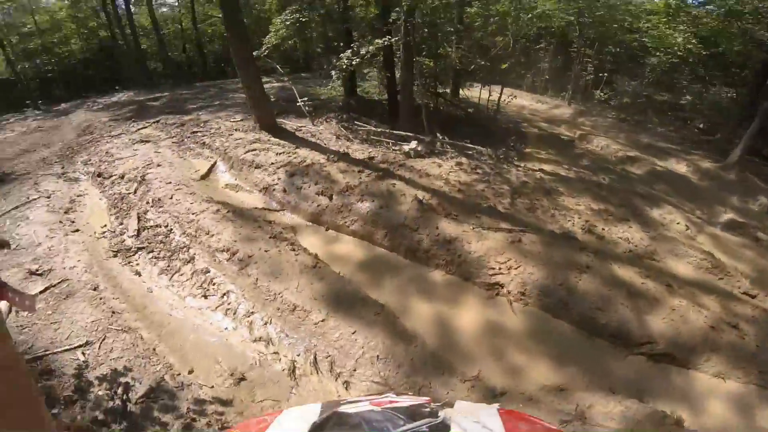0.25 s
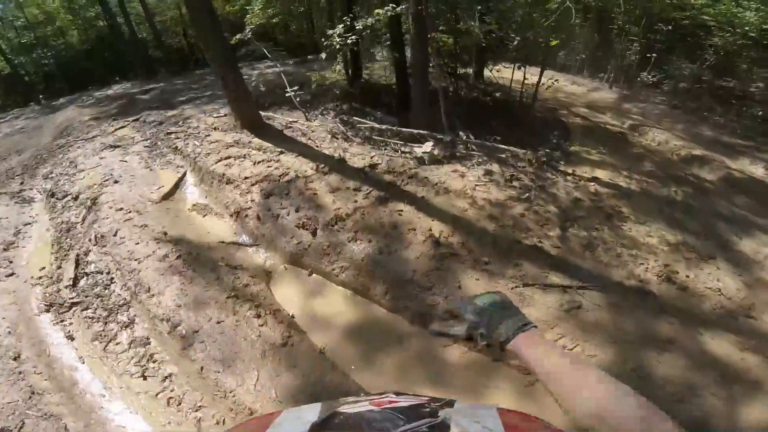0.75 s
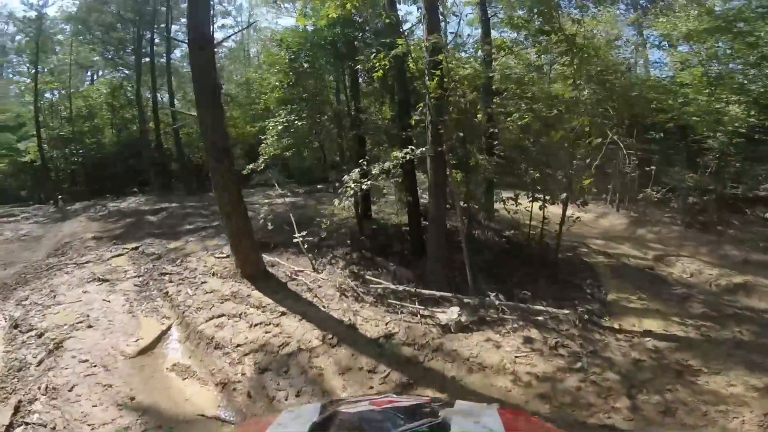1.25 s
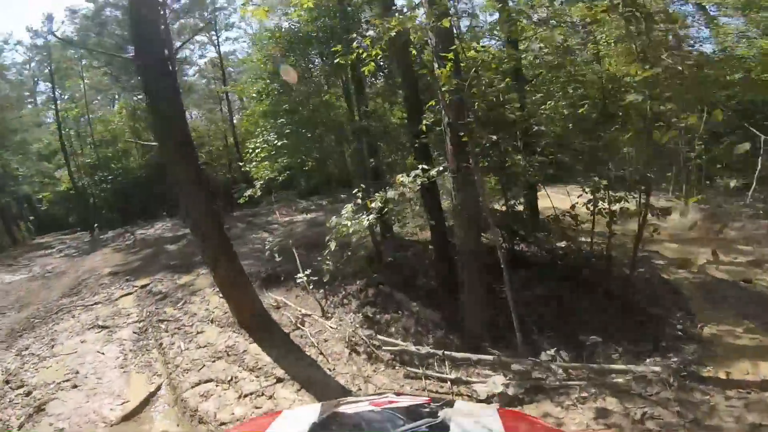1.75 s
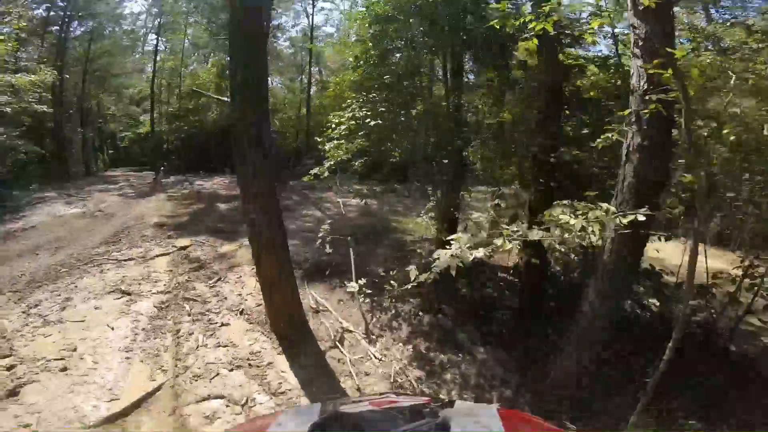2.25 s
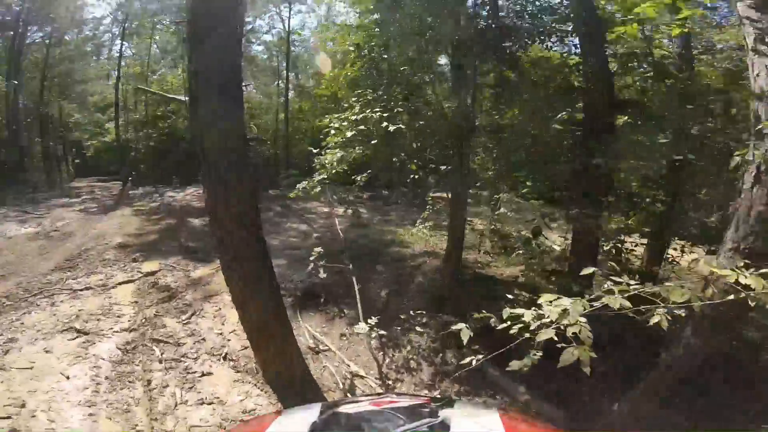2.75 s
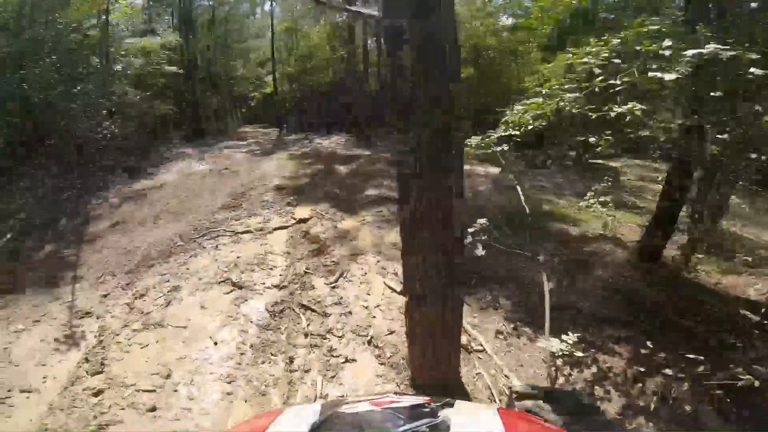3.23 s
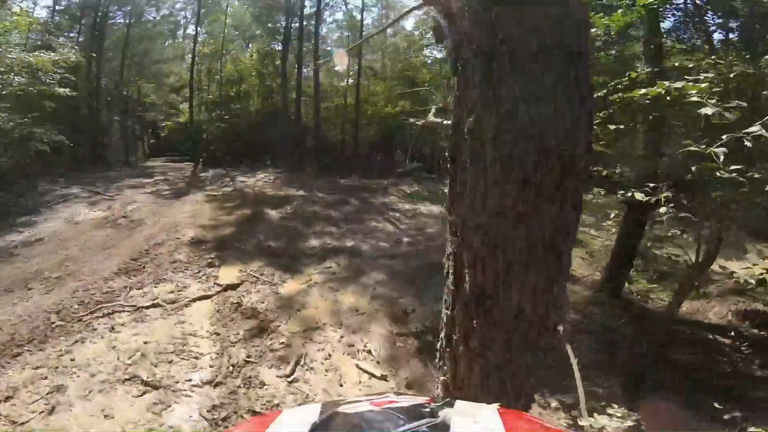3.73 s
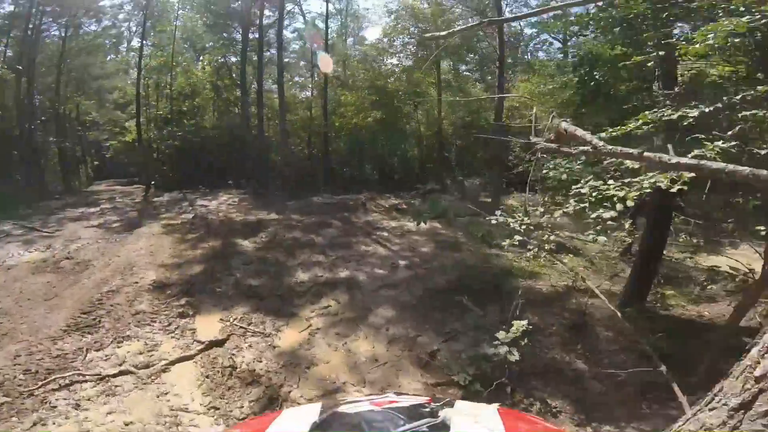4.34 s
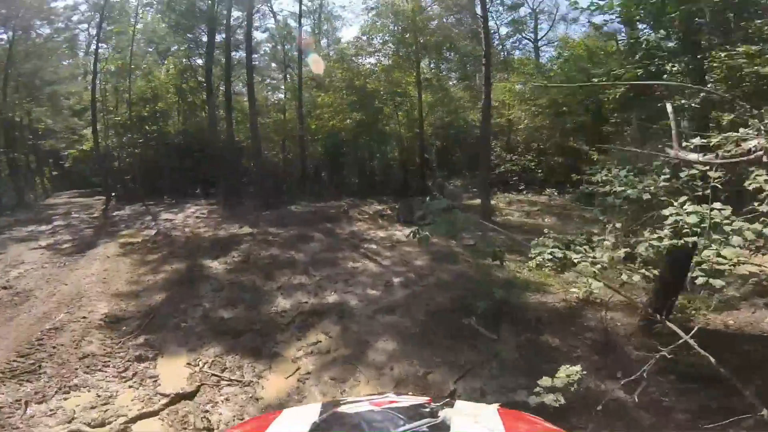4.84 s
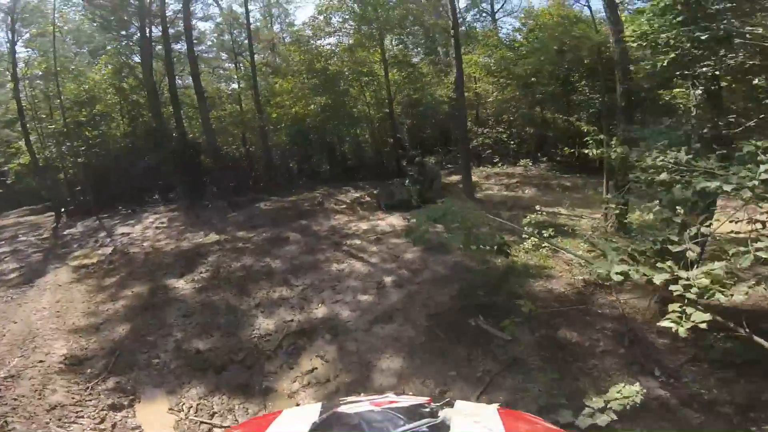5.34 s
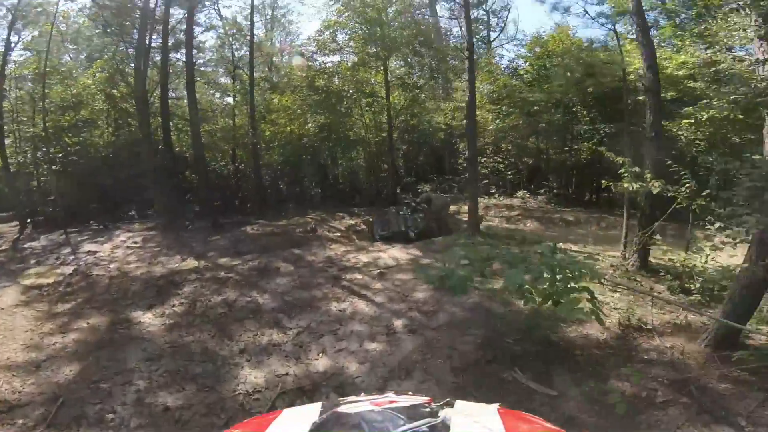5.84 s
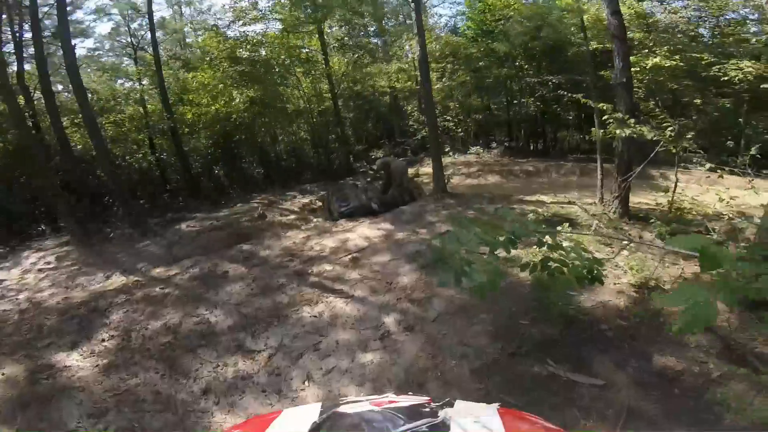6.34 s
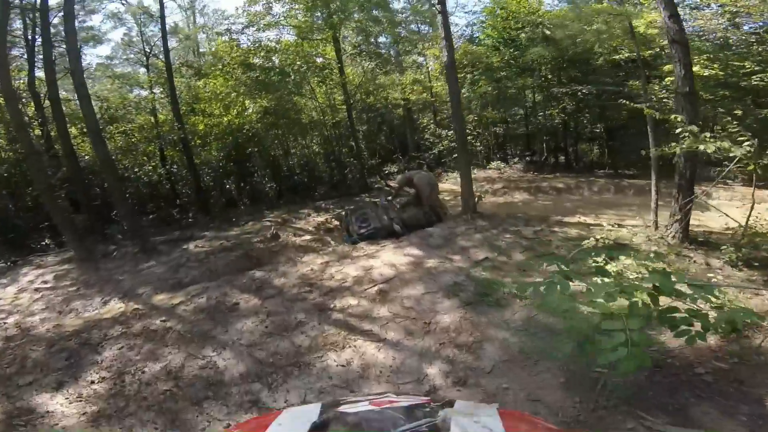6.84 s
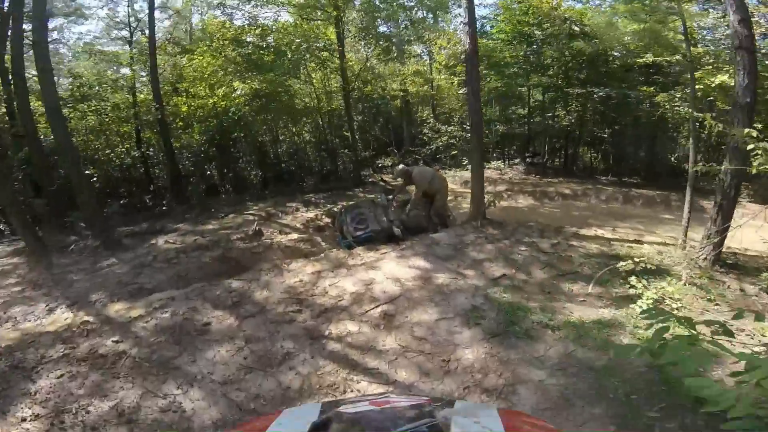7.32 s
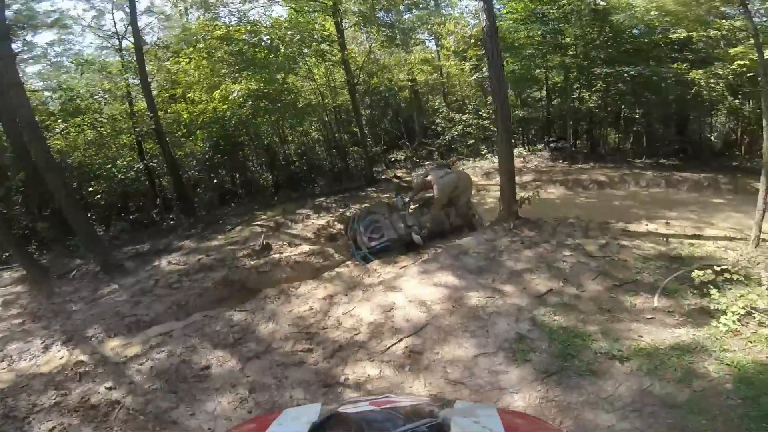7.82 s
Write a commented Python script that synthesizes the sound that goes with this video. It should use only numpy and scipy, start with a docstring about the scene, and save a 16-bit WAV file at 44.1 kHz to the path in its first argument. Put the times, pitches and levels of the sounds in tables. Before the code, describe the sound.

Outdoors on a wooded trail, close to the rider. From 0 to 0.5 s another machine revs upward with a growl and throbbing hiss, then fades, while a third engine idles alongside in slow, deep thuds. At about 0.6 to 1 s the rider's twin-cylinder ATV gives a short push and falls back. From 1.2 s the throttle opens into a long pull, full by 1.8 s and held to 4.3 s: uneven firings boom, drone, bark and rasp, with intake honks, belt whirr and loose rattles around 1.9 to 2.5 and 3.3 s; it labours briefly near 3.3 s. It drops to lumpy idle by 4.6 s. A free-running blip rises at 5.3 to 5.8 s, then slow puttering continues to about 8 s, with hiss, frame rumble, soft low bumps near 6.3, 7 and 7.6 s, and a quick scratchy brush at 7 s. Faint echoes scatter off ground and trunks.

```python
"""One first hears a machine rev briefly beside an idling one; then the rider's own twin-cylinder ATV takes over
on a wooded trail, with a short push, a long pull and a last blip between stretches of idle.
Each uneven pair of firings is a pair of pulses that excites pipe resonances: boom, drone, bark and rasp.
Filtered noise makes the belt and valve-gear hiss, whirrs, rattles, frame rumble and brushes of the rider's gear.
Soft low bumps at the microphone and scattered echoes from ground and trunks complete the scene."""
import sys
import numpy as np
from scipy import signal
from scipy.fft import rfft, irfft, next_fast_len
from scipy.io import wavfile

SR = 44100
rng = np.random.default_rng(int(sys.argv[2]) if len(sys.argv) > 2 else 0)


def pcm_store(signal):
    """Save signal as 16-bit PCM."""
    levels = np.round(np.clip(np.atleast_2d(signal), -1, 1) * 32767)
    wavfile.write(sys.argv[1], SR, levels.astype(np.int16).T)


N = 356107
T = np.arange(N) / SR  # time [s]
HZ = np.fft.rfftfreq(16384, 1 / SR)  # frequency grid of every filter [Hz]

# Levels below are relative: the functions add the trims of each layer.
# Engine speed on an open throttle: (time [s], cycle rate [1/s])
OPEN_SPEED = [(.8, 24.2), (.88, 23.7), (1, 25.5), (1.8, 23.15), (1.97, 24.26), (2.3, 24.28), (2.43, 25.05),
              (2.68, 25.1), (3.09, 23.23), (3.48, 23.72), (3.83, 25.39), (4.06, 24.85), (4.22, 25.4),
              (4.33, 25), (4.48, 21.5), (5.5, 24.2), (5.63, 25), (5.75, 24.5), (5.9, 23.3)]
# Engine speed on a shut throttle, which hunts: (time [s], four-stroke cycle rate [1/s])
SHUT_SPEED = [(.6, 12), (1.3, 11.98), (4.55, 12.64), (4.85, 10.8), (5.2, 13.53), (6.1, 12.28), (6.7, 11.11),
              (7.15, 11.69), (7.6, 9.99), (8.07, 12.01)]
# Presses of the thumb throttle: (opens [s], fully open [s], shuts [s], clutch grip [0-1], share of change [1],
# boom [dB], drone [dB], bark [dB], rasp [dB], hiss [dB])
PRESSES = [(0.602, 0.791, 0.96, 0.33, -0.33, -23.5, -35.5, -37.5, -50, -48.5),
           (1.15, 1.8, 4.34, 0.78, 1.15, -19, -31.5, -31.5, -46.5, -41.3),
           (5.271, 5.582, 5.82, 0.02, 1.2, -17, -32.5, -30, -53.5, -41)]
# Layers on a shut throttle: (boom [dB], drone [dB], bark [dB], rasp [dB], hiss [dB])
SHUT_DB = (-27, -46.5, -54, -65, -51.5)
# Change of the layers from start to end of a press, at a share of 1: boom and drone swell,
# bark, rasp and hiss sag: (boom [dB], drone [dB], bark [dB], rasp [dB], hiss [dB])
CHANGE_DB = (7.5, 8, -8, -4.5, -1)
# Lateness of the layers, as the power of the opening they follow: (boom, drone, bark, rasp, hiss [1])
LATENESS = (5.2, 1.1, 0.44, 0.52, 2.1)
# Boom offset of the shut throttle: (time [s], level [dB])
SHUT_LEVEL = [(1.3, -14.5), (4.55, 2), (5, -3), (6.2, -0.5), (7.4, -3.5), (8.07, 1.5)]
# Extra level of the rasp and in part the bark: it varies in the long pull and holds its end values
# before and after: (time [s], level [dB])
EXTRA_RASP = [(1.4, 7), (1.8, -6), (2.55, 7), (3.2, 6), (3.5, -1), (3.9, 7.5), (4.35, -5), (4.6, 9.5)]
# Lumpy firings that thump: (time [s], extra boom [dB], extra drone [dB])
THUMPS = [(.781, 2.5, 1.5), (.864, 5.5, 3), (4.73, 2.5, 5), (4.915, 0, 4.5), (5.228, 7, 3), (5.395, 4, 7),
          (6.42, 4, -3), (6.77, 3, 0), (7.775, 3, 6.5), (7.945, 3.5, 3)]
# Firings of altered strength in bark and rasp, mostly harder: (time [s], extra level [dB])
HARD = [(.781, 2.5), (.864, 4.5), (1.903, 1.5), (1.986, 3.5), (2.208, 4.5), (2.413, -0.5), (2.572, 2.5),
        (3.09, 3.5), (3.177, 3.5), (3.347, 3), (5.395, 4.5)]
# Exhaust resonances under load: (frequency [Hz], width [Hz], level [dB])
BOOM = [(52.3, 26, -16), (133.5, 29.3, 3.5), (161.5, 33, -1), (196, 10, -11.5)]
# Exhaust resonances running free: (frequency [Hz], width [Hz], level [dB])
PUTTER = [(120, 54, -14.5), (168.9, 25.2, 2.5), (200.9, 17, -1.5)]
# Resonances of the drone: (frequency [Hz], width [Hz], level [dB])
DRONE = [(265.8, 16, -1.5), (340.4, 67, 0), (469.8, 13, -2.5)]
# Resonances of the bark under load: (frequency [Hz], width [Hz], level [dB])
BARK = [(237.5, 46, 7), (390, 45, -4.5), (489, 39, 3.5), (558, 31, 0.5), (693, 82, -4), (494, 440, -8)]
# Resonances of the bark running free: (frequency [Hz], width [Hz], level [dB])
FREE_BARK = [(222, 38, 2), (396, 60, 4), (481, 130, 1), (594, 43, 1.5), (780, 110, -9.5), (946, 60, -7)]
# Sharp edge of each firing under load: (frequency [Hz], density [dB per Hz])
CRACK = [(60, -20), (220, 6.5), (420, -0.5), (900, -5.5), (1600, -31.5), (4000, -26), (9000, -57)]
# Resonances of the rasp: (frequency [Hz], width [Hz], level [dB])
RASP = [(810, 90, 5), (901, 80, 8), (1055, 134, 4), (1262, 74, 1), (1790, 810, -12.5)]
# Ringing of valve gear and engine covers: (frequency [Hz], width [Hz], level [dB])
CLATTER = [(1980, 230, -5), (3300, 1900, 1.5), (4000, 370, -6.5), (6310, 630, -1.5)]
# Steady hiss of belt drive and valve gear: (frequency [Hz], density [dB per Hz])
HISS = [(300, 3), (480, 11.5), (700, 8), (1000, 0.5), (1450, 2.5), (2400, -1), (3300, -2), (4100, -1.5),
        (4900, -7.5), (5900, -6.5), (6480, -3), (6800, -10.5), (9000, -20), (10200, -31.5), (11200, -22.5),
        (14000, -50.5)]
# Intake honks of the rider's engine: (time [s], half length [s], level [dB], order of the cycle rate [1])
HONKS = [(2, 0.29, -37.5, 28), (2.575, 0.22, -36, 28), (3.81, 0.31, -32, 14), (3.95, 0.4, -34.5, 13),
         (3.79, .3, -38.5, 19), (3.74, 0.29, -40, 11), (2.49, .35, -38, 11), (2.36, 0.32, -38, 14),
         (0.826, 0.048, -36, 16), (.86, 0.16, -37, 11), (5.66, 0.095, -34.5, 24), (5.624, 0.1, -41.5, 38),
         (5.72, 0.11, -45.5, 32), (5.812, .08, -31, 15), (5.7, .16, -25.5, 8)]
# Whirrs of belt and gears: (time [s], half length [s], level [dB], frequency [Hz], width [Hz])
WHIRRS = [(1.95, 0.41, -50.5, 3500, 1100), (3.62, 0.074, -47, 1940, 600), (4.2, 0.1, -45, 1590, 450),
          (5.76, 0.21, -45, 1980, 1200), (3.5, 0.83, -52, 6280, 450), (6.24, 0.57, -53, 2340, 3070),
          (7.102, 2.1, -54, 1490, 482)]
# Chatter of loose bodywork: (time [s], level [dB], frequency [Hz])
RATTLES = [(1.877, -36, 3500), (1.96, -36, 3500), (2.166, -37, 3100), (2.316, -38.5, 3300),
           (2.413, -34, 1760), (2.453, -34, 1730), (3.346, -39.5, 3403)]
# Speed of the machine alongside: (time [s], cycle rate [1/s])
IDLE_SPEED = [(0, 10.55), (1.7, 10.25), (4.7, 10.17), (6.7, 11), (7.2, 10.45)]
# Its marked thuds, mostly heavier: (time [s], extra level [dB])
IDLE_THUDS = [(.144, -1.5), (.631, 4.5), (1.289, 5.5), (1.681, 0), (4.713, 6), (4.911, 2), (6.545, -2),
              (6.725, 4), (6.905, 4), (7.478, 4)]
# Pipe resonances of its first cylinder: (frequency [Hz], width [Hz], level [dB])
IDLE_PIPE = [(60, 26, -0.5), (85.8, 36, 1.5), (127.8, 62, 3), (214, 37, -11)]
# Pipe resonances of its second cylinder: (frequency [Hz], width [Hz], level [dB])
IDLE_SECOND_PIPE = [(90, 44, -4.5), (171, 55, -0.5), (324, 83, -22)]
# Speed of the third machine: (time [s], cycle rate [1/s])
REV_SPEED = [(0, 27.3), (.14, 28.4), (.2, 29.1), (.32, 30.9), (.37, 31.3), (.44, 33.2), (.51, 34.4),
             (.6, 33.2), (.8, 28)]
# Its pipe resonances: (frequency [Hz], width [Hz], level [dB])
REV_PIPE = [(212, 59, 7.5), (370, 57, 1), (568, 130, 0), (750, 46, -2.5), (880, 130, -5), (1110, 71, -8.5),
            (1290, 71, -9)]
# Its hiss: (frequency [Hz], density [dB per Hz])
REV_HISS = [(300, 5.5), (1000, 4.5), (2200, -2), (3800, -3.5), (5000, -16.5), (6400, -10.5), (7200, -19),
            (9000, -26.5), (14000, -64)]
# Its intake honks: (time [s], half length [s], level [dB], order of the cycle rate [1])
REV_HONKS = [(.14, 0.063, -44, 22), (.32, .1, -42, 16), (.35, 0.045, -39.5, 33), (.35, .1, -42.5, 29),
             (.5, 0.071, -31.5, 17), (.5, 0.043, -31, 28), (.47, 0.1, -40.5, 38)]
# Brushes of cloth and twigs: (time [s], level [dB], half length [s])
BRUSHES = [(0.885, -44.5, 0.024), (1.633, -39, 0.009), (6.952, -50, 0.0067), (7.003, -31.5, 0.0098),
           (7.5, -48, 0.0098)]
# Spectrum of the brushes: (frequency [Hz], density [dB per Hz])
BRUSH = [(600, -33), (1300, 2), (1900, -9.5), (3400, 4.5), (5200, -6), (6500, 0), (9000, -21),
         (10200, -28.5), (11500, -22.5), (14000, -50.5)]
# Soft bumps at the microphone: (time [s], level [dB])
BUMPS = [(5.05, -33), (6.3, -19.5), (7.02, -16.5), (7.6, -27)]
# Shaking of frame and bodywork: (frequency [Hz], density [dB per Hz])
RUMBLE = [(10, -17), (25, -0.5), (50, 8.5), (100, 10), (190, 7), (260, -8.5), (420, -20.5), (900, -56.5)]

FIRES_AT_S = [3.091, 5.596]  # moments at which the first cylinder fires
LAG = .355  # share of a cycle until the second cylinder follows
RUN_DOWN_S = .3  # from open throttle back to idle
BARK_SHARE = 0.55  # share of the rasp's extra level that the bark takes
CRACK_DB = -3.5  # level of the crack against the bark's layer level
# the engine labours midway through the pull: the first cylinder barks harder and the drone thins
LUG_S, LUG_HALF_S, LUG_BARK_DB, LUG_DRONE_DB = 3.266, 0.2, 6.5, -3.5
HONK_WIDTH_HZ = 23.3
RATTLE_DECAY_S, RATTLE_WIDTH_HZ = 0.015, 610
REV_DB, REV_DB_PER_HZ = -26, 2.5  # at top speed, and the loss per cycle rate below it
# the third machine's level drops as its throttle shuts, then fades
REV_SHUTS_S, REV_DROP_S, REV_DROP_DB, REV_FADE_S = 0.508, 0.062, -6, 0.69
CUT_HZ = 14100  # top of the treble


def own_engine():
    """Source and filter: one train of firings excites the resonances of every engine layer."""
    speed, opened, grip, (boom_db, drone_db, bark_db, rasp_db, hiss_db) = throttle()
    extra_db, = curves(EXTRA_RASP)
    lug = bell(LUG_S, LUG_HALF_S)
    idle_db = curves(SHUT_LEVEL)[0] + 1.85 * wander(rate_hz=7.4)
    boom_db = boom_db + (1 - opened) * idle_db
    drone_db = drone_db + LUG_DRONE_DB * lug - 3.0
    beats = FIRES_AT_S + [s for s, _, _ in THUMPS]
    exhaust = firings(speed, beats, second=0.66, lag=LAG)
    cracks = firings(speed, beats, second=amp(1.5 - 7.3 * lug), lag=LAG, jitter=.001)
    cracks = cracks * amp(sum(db * (abs(T - s) < .006) for s, db in HARD))
    barking_db = bark_db + BARK_SHARE * extra_db + LUG_BARK_DB * lug - 6.0
    crack = ring(cracks, slope(CRACK)) * grip ** 2 * amp(bark_db + CRACK_DB)
    honk = honks(speed, beats, HONKS) * opened ** 4 * amp(2 * wander(rate_hz=10) - 1)
    pipes = boom_and_drone(exhaust, opened, grip, boom_db, drone_db)
    barks = bark(cracks, opened, grip) * amp(barking_db)
    rasps = rasp(cracks, grip) * amp(rasp_db + extra_db)
    return pipes + barks + crack + honk + rasps + clatter_and_hiss(cracks, opened, hiss_db)


def throttle():
    """Control by envelopes: each press moves speed, clutch grip and layers from idle, then lets them run down."""
    opening, grip = np.zeros(N), np.zeros(N)
    levels = [np.full(N, float(db)) for db in SHUT_DB]
    for opens, full, shuts, grips, share, *open_db in PRESSES:
        press = ease((T - opens) / (full - opens)) * (1 - ease((T - shuts) / RUN_DOWN_S))
        progress = np.clip((T - opens) / (shuts - opens), 0, 1) - .5
        opening = opening + press
        grip = grip + grips * press
        layers = zip(levels, open_db, SHUT_DB, CHANGE_DB, LATENESS)
        levels = [level + press ** late * (db + share * change * progress - shut)
                  for level, db, shut, change, late in layers]
    speed = (1 - opening) * curves(SHUT_SPEED)[0] + opening * curves(OPEN_SPEED)[0]
    return speed, opening, np.clip(grip, 0, 1), levels


def boom_and_drone(exhaust, opened, grip, boom_db, drone_db):
    """Pipe resonance: pulling, the exhaust booms deep; running free, it putters higher; a drone lies above."""
    thump = amp(sum(db * bell(s, half=.025) for s, db, _ in THUMPS))
    hollow = amp(sum(db * bell(s, half=.025) for s, _, db in THUMPS))
    sputter = exhaust + amp(-14 - 2 * opened) * puffs(exhaust, decay_s=.04)
    loaded = np.sqrt(grip) * ring(exhaust * thump, pipe(BOOM))
    free = np.sqrt(1 - grip) * ring(sputter * thump, pipe(PUTTER)) * amp(-1.0)
    drone = ring(sputter * hollow, pipe(DRONE)) * amp(drone_db)
    return (loaded + free) * amp(boom_db) + drone


def bark(cracks, opened, grip):
    """Load-dependent resonance: the bark crossfades at constant power between a free and a pulling colour."""
    # a shut throttle mostly rustles; an open one barks, the more cleanly the harder it pulls
    rustle = amp(-3 - 10 * opened - 2 * grip) * puffs(cracks, decay_s=.03)
    barking = np.sqrt(opened) * cracks + rustle
    loading = np.clip(grip / (opened + .01) / .8, 0, 1)
    pulling = np.sqrt(loading) * ring(barking, pipe(BARK))
    return pulling + np.sqrt(1 - loading) * ring(barking, pipe(FREE_BARK))


def rasp(cracks, grip):
    """Turbulence on pulses: uneven firings and bursts of noise tear through the upper resonances."""
    uneven = cracks * amp(1.5 * wander(rate_hz=25))
    tearing = np.sqrt(grip) * uneven + .7 * puffs(uneven, decay_s=.022)
    return ring(tearing, pipe(RASP))


def clatter_and_hiss(cracks, opened, hiss_db):
    """Structural ringing: noise after each firing rings the covers, over steady noise of belt and valve gear."""
    knocks = cracks * amp(2.8 * wander(rate_hz=20))
    clatter = ring(puffs(knocks, decay_s=0.0042), pipe(CLATTER)) * amp(hiss_db - 12.0 + 3.1 * opened)
    noise = rng.standard_normal(N) * amp(1.0 * wander(rate_hz=13))
    return clatter + ring(noise, slope(HISS)) * amp(hiss_db + 3.0)


def honks(speed, fires_at_s, rows):
    """Order resonance: an intake sings on single multiples of the cycle rate and glides with them."""
    pulses = firings(speed, fires_at_s, second=0, lag=LAG)
    turns = np.cumsum(speed) / SR
    r = np.exp(-np.pi * HONK_WIDTH_HZ / SR)
    gain = np.sqrt(8 * (1 - r) ** 3)
    out = np.zeros(N)
    for s, half, db, order in rows:
        # shift the order down to 0 Hz, smooth it there, and shift it back
        turn = np.exp(2j * np.pi * order * turns)
        smoothed = signal.lfilter([gain], [1, -2 * r, r * r], pulses / turn)
        out += amp(db) * bell(s, half) * (turn * smoothed).real
    return out


def whirrs():
    """Band-limited noise: belt and gears whirr in narrow, fluttering bands as the drive works and idles."""
    flutter_db = 2 * wander(rate_hz=20)
    out = np.zeros(N)
    for s, half, db, hz, width in WHIRRS:
        band = ring(rng.standard_normal(N), pipe([(hz, width, 0)]))
        out += band * amp(db + flutter_db) * bell(s, half)
    return out


def rattles():
    """Impulsive excitation: decaying noise rings one resonance as loose bodywork chatters briefly."""
    out = np.zeros(N)
    for s, db, hz in RATTLES:
        chatter = (T >= s) * np.exp(-abs(T - s) / RATTLE_DECAY_S) * rng.standard_normal(N)
        out += amp(db) * ring(chatter, pipe([(hz, RATTLE_WIDTH_HZ, 0)]))
    return out


def revving_machine():
    """Source and filter: a brief growling rev with throbbing hiss, louder with speed, fading once shut."""
    speed, = curves(REV_SPEED)
    drop_db = REV_DROP_DB * ease((T - REV_SHUTS_S) / REV_DROP_S)
    level_db = REV_DB + REV_DB_PER_HZ * (speed - speed.max()) + drop_db
    fade = 1 - ease((T - REV_SHUTS_S) / REV_FADE_S)
    pulses = firings(speed, 0, second=0.78, lag=LAG)
    gas = amp(-18) * puffs(pulses, decay_s=.02)
    growl = ring(pulses + gas, pipe(REV_PIPE))
    hiss = amp(-2.5) * ring(puffs(pulses, decay_s=0.12), slope(REV_HISS))
    return amp(level_db) * fade * (growl + hiss) + honks(speed, 0, REV_HONKS)


def idling_machine():
    """Two resonators struck in turn: a deep thud of one cylinder, then a higher, softer one of the other."""
    speed, = curves(IDLE_SPEED)
    beats, second_after_s = np.transpose(IDLE_THUDS)[0], .033
    heavy_db = sum(db * bell(s, half=.02) for s, db in IDLE_THUDS)
    first = firings(speed, beats, second=0, lag=LAG) * amp(heavy_db)
    second = firings(speed, beats + second_after_s, second=0, lag=LAG)
    return amp(-30.0) * ring(first, pipe(IDLE_PIPE)) + amp(-33.5) * ring(second, pipe(IDLE_SECOND_PIPE))


def handling():
    """Friction and impact: grainy noise brushes by, and short low oscillations bump the microphone."""
    stroke = sum(amp(db) / (1 + ((T - s) / half) ** 2) for s, db, half in BRUSHES)
    grain = unit(rng.standard_normal(N) * amp(2.6 * wander(rate_hz=130)))
    out = ring(stroke * grain, slope(BRUSH))
    bump_hz, bump_half_s = 36, .026
    for s, db in BUMPS:
        out -= amp(db) * bell(s, bump_half_s) * np.cos(2 * np.pi * bump_hz * (T - s))
    return out


def rumble():
    """Random vibration: low noise of wandering level, the shaking of frame and bodywork."""
    return amp(-28.5 + 2.8 * wander(rate_hz=8.8)) * ring(rng.standard_normal(N), slope(RUMBLE))


def woods(x, t60):
    """Sparse reflection: scattered, decaying echoes from the ground and the trunks."""
    t = T[:SR]
    taps = rng.standard_normal(SR) * (rng.random(SR) < .03) * (t > .012) * amp(-60 * t / t60)
    return signal.oaconvolve(x, taps / np.linalg.norm(taps))[:N]


def firings(speed, fires_at_s, second, lag, jitter=0):
    """Periodic excitation: two pulses a cycle, mean power about 1, the second a share lag of a cycle late."""
    turns, out = np.cumsum(speed) / SR, np.zeros(N)
    # align the first cylinder to the given moments; the beat slips mostly while the engine turns slowly
    slack = np.cumsum(speed ** -8.)
    beats = (np.sort(np.atleast_1d(fires_at_s)) * SR).astype(int)
    turns = turns - np.interp(slack, slack[beats], np.unwrap(turns[beats], period=1))
    for delay, size in ((0, 1), (lag, second)):
        at = np.flatnonzero(np.diff(np.floor(turns - delay)))
        strength, late = rng.standard_normal((N // 100, 2))[:len(at)].T
        period = SR / speed[at]  # in samples
        # combustion is less even when the engine turns slowly
        lumpy = (11 / speed[at]) ** 2
        height = np.broadcast_to(size, N)[at] * np.sqrt(period) * amp((.6 + .6 * lumpy) * strength)
        shift = ((.004 * lumpy + jitter) * late * period).astype(int)
        out[np.clip(at + shift, 0, N - 1)] += height
    return out / np.sqrt(1 + second ** 2)


def puffs(pulses, decay_s):
    """Turbulent gas: a burst of noise dying away after each pulse."""
    envelope = signal.lfilter([1], [1, -np.exp(-1 / (decay_s * SR))], pulses)
    return unit(envelope * rng.standard_normal(N))


def pipe(modes):
    """Modal response: gain of a set of steep resonances, added in power."""
    return np.sqrt(sum((amp(db) / (1 + (2 * (HZ - hz) / width) ** 2)) ** 2 for hz, width, db in modes))


def slope(points):
    """Spectral envelope: gain joined by straight lines in level over log frequency."""
    hz, db = np.transpose(points)
    return amp(np.interp(np.log(HZ + 1), np.log(hz), db))


def ring(x, gain):
    """Minimum phase: passes x through a causal filter of this gain's shape and of energy 1."""
    log_gain = np.log(np.maximum(np.r_[gain, gain[-2:0:-1]], gain.max() * 1e-5))
    response = np.exp(np.conj(signal.hilbert(log_gain)))
    taps = np.fft.ifft(response).real[:len(gain) // 2]
    return signal.oaconvolve(x, taps / np.linalg.norm(taps))[:N]


def wander(rate_hz):
    """Low-passed noise: slow chance of rms 1."""
    size = next_fast_len(N)
    hz = np.fft.rfftfreq(size, 1 / SR)
    spectrum = rfft(rng.standard_normal(size)) * np.exp(-(hz / rate_hz) ** 2)
    return unit(irfft(spectrum, size)[:N])


def curves(rows):
    """Linear interpolation: the columns of a table, joined by straight lines in time, end values held."""
    s, *columns = np.transpose(rows)
    return [np.interp(T, s, c) for c in columns]


def ease(u):
    """Raised sine: a smooth step from 0 to 1."""
    return np.sin(np.pi / 2 * np.clip(u, 0, 1)) ** 2


def bell(s, half):
    """Gaussian envelope: a smooth swell of height 1 around the time s."""
    return np.exp(-((T - s) / half) ** 2)


def amp(db):
    """Decibel law: level to amplitude ratio."""
    return 10 ** (np.asarray(db) / 20)


def unit(x):
    """Power normalisation: scales x to rms 1."""
    return x / np.sqrt(np.mean(x ** 2) + 1e-20)


def scene():
    """Superposition: engines and their echoes, drive whirrs, rumble and handling add up."""
    engines = own_engine() + rattles() + idling_machine() + revving_machine()
    echoes = amp(-16) * woods(engines, t60=.3)
    return (engines + echoes + whirrs() + rumble() + handling())[None]


def record(dry):
    """Band limiting: the lowest shaking and the top treble are removed; the ends are softened."""
    dry = signal.sosfilt(signal.butter(2, 18, "highpass", fs=SR, output="sos"), dry)
    dry = dry * np.clip(np.minimum(T, T[-1] - T) / .004, 0, 1)
    treble_cut = signal.firwin(511, CUT_HZ, window=("kaiser", 9), fs=SR)
    return signal.oaconvolve(dry, treble_cut[None], "same")


dry = scene()
out = record(dry)
pcm_store(out)
```